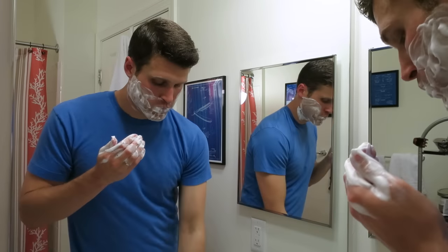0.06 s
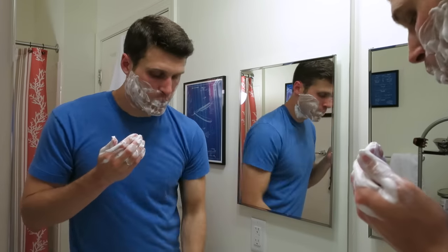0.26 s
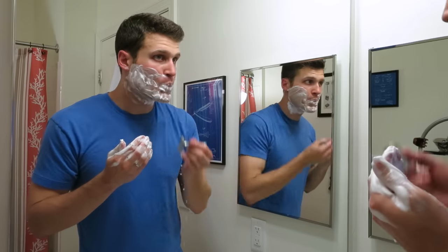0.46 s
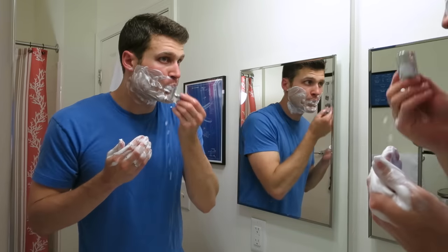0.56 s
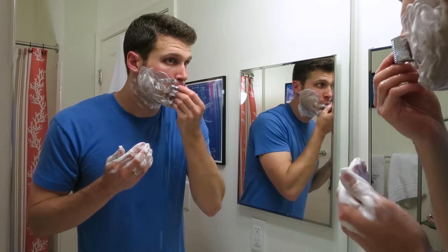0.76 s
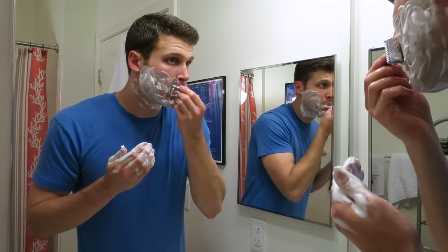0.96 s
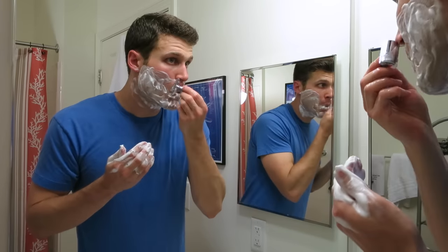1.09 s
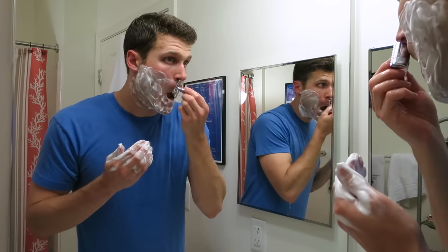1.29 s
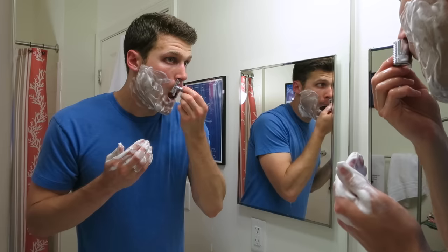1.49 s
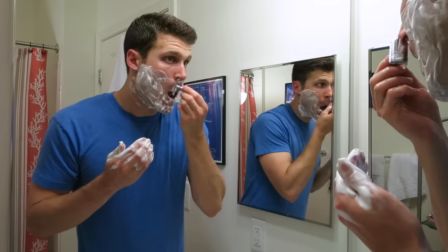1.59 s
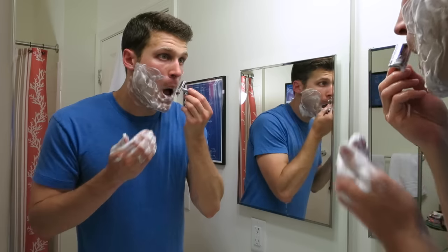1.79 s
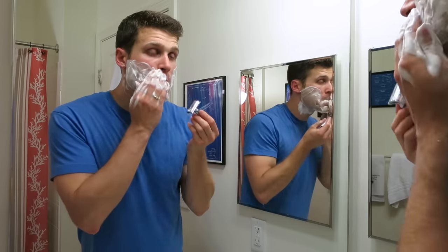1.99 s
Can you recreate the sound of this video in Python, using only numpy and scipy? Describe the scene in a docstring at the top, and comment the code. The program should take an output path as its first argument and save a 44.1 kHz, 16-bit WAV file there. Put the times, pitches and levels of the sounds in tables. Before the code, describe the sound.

A razor swishes through basin water, then faintly scrapes lathered stubble in a small bathroom.

```python
"""Rinsing a razor and shaving

A razor is swished once through a filled basin, making it ring, and lifted out with a light splash.
Drops fall back and trap ringing bubbles while the blade makes short, faint strokes through lathered
stubble. The small tiled bathroom echoes briefly and is filled with a quiet hiss and a low hum."""
import sys
import numpy as np
from scipy import signal
from scipy.fft import rfft, irfft
from scipy.io import wavfile

SR = 44100
rng = np.random.default_rng(int(sys.argv[2]) if len(sys.argv) > 2 else 0)


def dump(signal):
    """Clip the signal to [-1, 1] and save it as 16-bit WAV at the path in sys.argv[1]."""
    limited = np.clip(np.atleast_2d(signal).T, -1, 1)
    pcm = np.round(limited * 32767).astype(np.int16)
    wavfile.write(sys.argv[1], SR, pcm)


N = 90404
T = np.arange(N) / SR

# How alike nearby sounds are in both ears. Each row: frequency in Hz, likeness from -1 to 1.
NEAR_LIKENESS = [(2200, 0.86), (5500, 0.48), (9000, 0.03), (14000, -0.3)]
# The tone of the finest droplets and foam. Each row: frequency in Hz, relative level in dB.
MIST_TONE = [(1000, -22), (3000, -8), (6000, -3.5), (8500, -4), (11000, 0.5), (13500, 0), (16000, -10)]


def from_db(db):
    """Turn decibels into a number to multiply by."""
    return 10 ** (np.asarray(db) / 20)


def rms_one(x):
    """Scale a sound so that its average strength (rms) is 1."""
    return x / np.sqrt(np.mean(x ** 2) + 1e-20)


def at_hz(points, hz):
    """Read between the rows of a table, giving every octave equal space."""
    row_hz, values = np.array(points).T
    return np.interp(np.log(np.maximum(hz, 1)), np.log(row_hz), values)


def colour(x, tone):
    """Turn each frequency up or down as a tone table says."""
    size = x.shape[-1]
    gain = from_db(at_hz(tone, np.fft.rfftfreq(size, 1 / SR)))
    return irfft(rfft(x) * gain, size)


def stereo(pair, tone, likeness=NEAR_LIKENESS):
    """Blend two unrelated noises into left and right with the given tone, at strength 1."""
    alike = np.clip(at_hz(likeness, np.fft.rfftfreq(N, 1 / SR)), -.99, .99)
    mid, side = irfft(rfft(pair) * np.sqrt([1 + alike, 1 - alike]), N)
    return rms_one(colour(np.array([mid + side, mid - side]), tone))


def clicks(per_s=7000, spread_db=2.8):
    """Two streams of random clicks of uneven size; the default settings suit splashing water."""
    sizes = from_db(spread_db * np.minimum(rng.exponential(1, (2, N)), 4))
    signs = rng.choice([-1, 1], (2, N))
    happens = rng.random((2, N)) < per_s / SR
    return rms_one(sizes * signs * happens)


def envelope(rows):
    """Loudness over time: each event rises, holds, then loses 20 dB in every fall time."""
    loudness = 0
    for start, rise, hold, fall, db in rows:
        fade_db = 20 * np.maximum(T - start - rise - hold, 0) / fall
        loudness += from_db(db - fade_db) * np.clip((T - start) / rise, 0, 1)
    return loudness


def tick_tone(hz):
    """The tone of a wet tick: one broad peak, 15 dB weaker for each octave away."""
    return [(hz * 2. ** octave, -15 * abs(octave)) for octave in range(-4, 5)]


def background():
    """The room's air hisses steadily over a low hum."""
    # The tone of the hiss. Each row: frequency in Hz, relative level in dB.
    air_tone = [(25, -11), (42, -6), (60, 1), (80, -2.5), (115, 2.5), (180, 4.5), (300, 3.5), (700, -1),
                (1400, -5.5), (2500, -8), (4800, -12), (8000, -18), (13000, -21), (16000, -34)]
    # How alike the hiss is in both ears. Each row: frequency in Hz, likeness from -1 to 1.
    air_likeness = [(60, .55), (130, -.35), (290, -.6), (640, -.45), (1400, .25), (3100, .55), (6800, .4),
                    (14000, 0)]
    # The notes of the hum. Each row: pitch in Hz, level in dB.
    hum_notes = [(60, -69), (118, -72)]
    hum = sum(from_db(db) * np.sqrt(2) * np.sin(2 * np.pi * (hz * T + rng.random()))
              for hz, db in hum_notes)
    hiss = from_db(-48) * stereo(rng.standard_normal((2, N)), air_tone, air_likeness)
    return hiss + hum


def lather():
    """Tiny bubbles burst in the foam, fizzing faintly all the time."""
    return from_db(-66) * stereo(clicks(per_s=2000, spread_db=3), MIST_TONE)


def splashes():
    """Droplets come down in short showers: a coarse spray and a finer mist."""
    # Light splashes. Each row: start, rise, hold and fall in seconds, spray and mist levels in dB.
    showers = [(0.144, 0.0032, .003, .04, -49, -58), (0.153, .008, .014, .05, -56, -48.5),
               (0.2, .004, .012, .02, -37, -56), (0.268, .006, .035, .03, -58, -51),
               (0.316, .002, 0.0027, .01, -41, -42), (0.326, 0.0061, 0.0256, .12, -54, -50),
               (0.405, .012, .012, .016, -39, -54), (0.428, 0.00284, 0.005, .03, -43, -45),
               (0.443, 0.0047, 0.0092, .06, -47, -52), (0.538, .003, 0.0084, 0.01, -59, -52),
               (0.557, 0.00287, 0.00394, 0.0362, -47, -49)]
    # The tone of the spray. Each row: frequency in Hz, relative level in dB.
    spray_tone = [(60, -18.5), (200, -3.5), (600, -4.5), (1200, 0), (2200, -1.5), (3300, -1), (4500, -6.5),
                  (6500, -6.5), (8500, -16), (13000, -25), (16000, -32)]
    spray = envelope([(*timing, db) for *timing, db, _ in showers])
    mist = envelope([(*timing, db) for *timing, _, db in showers])
    return spray * stereo(clicks(), spray_tone) + mist * stereo(clicks(), MIST_TONE)


def drops():
    """Each drop gives a wet tick and traps a bubble that rings, wavering and rising in pitch."""
    # Trapped bubbles. Each row: start in seconds, starting pitch in Hz, level in dB,
    # seconds to swell, seconds to fade by 60 dB, tick level in dB compared with the bubble.
    bubbles = [(0.146, 1010, -38, 0.0031, 0.02, -2), (0.169, 615, -37.5, 0.002, 0.022, -7),
               (0.225, 1175, -22, .003, .035, -14), (0.245, 1700, -25, .004, 0.08, -18.5),
               (0.277, 1842, -29.5, 0.0023, 0.016, -12), (0.318, 2172, -30.5, 0.00072, 0.022, -8),
               (0.336, 2040, -38, 0.0024, 0.028, -8), (0.405, 388, -43, 0.0043, 0.05, -12),
               (0.421, 1169, -28, 0.00183, 0.06, -12), (0.425, 964, -35, .002, .04, -12),
               (0.426, 3404, -33, 0.0021, 0.0172, -9.5), (0.5465, 740, -27, 0.008, 0.03, -25),
               (0.602, 234.6, -42, 0.00447, 0.042, -5.5), (0.637, 6680, -48.5, 0.00185, 0.023, -1),
               (0.783, 3290, -38, .0015, .04, -1.5), (0.801, 3858, -43, 0.00205, .02, -3.5),
               (0.813, 3260, -38, .0013, .04, 0), (0.853, 6694, -44, 0.00193, .025, 0),
               (0.917, 3300, -45, 0.002, 0.02, 6), (0.957, 1540, -44, .007, 0.07, -4),
               (1.2146, 2945, -38, .003, .03, -3), (1.661, 2188, -38.5, 0.002, .06, -6)]
    rise_per_s, wobble_depth = 3.02, .025  # as shares of the starting pitch
    wobble_hz, tick_fade_s = 200, .0357
    smoothing = signal.butter(2, wobble_hz, fs=SR, output="sos")
    out, t = np.zeros(N + SR), T[:SR // 5]
    for start, hz, db, swell, fade, tick_db in bubbles:
        wobble = rms_one(signal.sosfilt(smoothing, rng.standard_normal(len(t))))
        pitch = hz * (1 + rise_per_s * t + wobble_depth * wobble)
        ring = np.sin(2 * np.pi * np.cumsum(pitch) / SR)
        ring *= from_db(-60 * np.maximum(t - swell, 0) / fade)
        tick = rms_one(colour(rng.standard_normal(len(t)), tick_tone(hz)))
        tick *= from_db(tick_db - 60 * t / tick_fade_s)
        attack = np.sqrt(np.clip(t / swell, 0, 1))
        first = int(start * SR)
        out[first:first + len(t)] += from_db(db) * attack * (ring + tick)
    return out[:N]


def basin(x):
    """The basin rings at its own notes when pushed, with little sound below or above them."""
    # The basin's notes. Each row: pitch in Hz, width in Hz (narrow rings longer), relative level in dB.
    basin_notes = [(189, 9, -7), (378, 35, -7), (437, 20, 1.5), (512, 25, -2), (595, 35, -8), (732, 45, -2),
                   (964, 26, 2), (1013, 25, -2.5), (1182, 36, 5), (1258, 25, 0), (1398, 30, -6),
                   (1543, 25, -4), (1604, 30, -4), (1748, 55, -3), (1839, 30, -5), (2655, 320, -14)]
    band_hz = [89.2, 3365]
    ringing = 0
    for hz, width, db in basin_notes:
        decay = np.exp(-np.pi * width / SR)
        feed = np.array([1, 0, -1]) * (1 - decay ** 2) / 2
        feedback = [1, -2 * decay * np.cos(2 * np.pi * hz / SR), decay ** 2]
        ringing += from_db(db) * signal.lfilter(feed, feedback, x + 1e-18)
    return signal.sosfilt(signal.butter(3, band_hz, "band", fs=SR, output="sos"), ringing)


def swish():
    """The razor churns the water, which rings the basin and tears into froth."""
    # The razor's pushes. Each row: start, rise, hold and fall in seconds, level in dB.
    pushes = [(0.147, .004, .04, .08, -47), (0.198, .009, .028, .06, -23.5)]
    # The tone of the froth. Each row: frequency in Hz, relative level in dB.
    froth_tone = [(60, -31), (250, -8), (600, 1), (1200, 0), (2000, -6), (3000, -5), (6200, -13),
                  (8000, -20), (13000, -24), (16000, -33)]
    stereo_width = np.sqrt(.02)
    effort, churn = envelope(pushes), clicks()
    mid, side = basin(churn * effort) / basin(churn).std()
    body = mid + stereo_width * side * [[1], [-1]]
    froth = from_db(-11) * effort * stereo(clicks(), froth_tone)
    return body + froth


def spatters():
    """Single droplets hit the basin wall with a sharp, bright tick."""
    # Droplet hits. Each row: start in seconds, strongest frequency in Hz, level in dB.
    droplet_hits = [(.1705, 12000, -40), (.2245, 6500, -31), (.231, 12000, -35), (.318, 11000, -35),
                    (.416, 6400, -30.5), (.431, 12500, -36.5)]
    rise_s, hold_s, fall_s = .001, 0, .005
    out = 0
    for start, hz, db in droplet_hits:
        crack = stereo(rng.standard_normal((2, N)), tick_tone(hz))
        out += envelope([(start, rise_s, hold_s, fall_s, db)]) * crack
    return out


def knocks():
    """Water bumps against the basin a few times and sets it ringing."""
    # The water's bumps. Each row: start in seconds, strength in dB before softening.
    bumps = [(0.179, -34), (0.2075, -20), (0.2283, -9), (0.4225, -30)]
    soften_above_hz = 2200
    taps = np.zeros(N)
    for start, db in bumps:
        taps[int(start * SR)] += from_db(db)
    soft_taps = signal.sosfilt(signal.butter(1, soften_above_hz, fs=SR, output="sos"), taps)
    full_tap_peak = np.abs(basin(signal.unit_impulse(N))).max()
    return basin(soft_taps) / full_tap_peak


def plunge():
    """The razor shoves the water aside with a brief low gulp."""
    # The gulp: start and length in seconds, pitch in Hz, level in dB.
    gulp = (.198, .042, 124, -37.5)
    start, length, hz, db = gulp
    progress = np.clip((T - start) / length, 0, 1)
    swell = np.sqrt(np.abs(np.sin(np.pi * progress)))
    return from_db(db) * swell * np.sin(2 * np.pi * hz * length * progress)


def shaving():
    """In each stroke the blade snips through many hairs and rasps on the skin."""
    # Blade strokes. Each row: start, rise, hold and fall in seconds, snip and rasp levels in dB.
    strokes = [(0.705, .012, 0.07, 0.12, -52.5, -54), (0.814, 0.006, 0.014, .04, -50.5, -51),
               (0.868, .022, .025, .09, -44.5, -52), (0.965, 0.015, .008, .02, -51.5, -52),
               (1.06, .02, .02, .03, -42.5, -53), (1.12, 0.0091, .01, .03, -47.5, -59),
               (1.245, .008, .014, .03, -60, -54), (1.305, 0.0247, .065, 0.05, -54.5, -66),
               (1.542, .033, 0.012, .055, -47.5, -58), (1.745, 0.019, 0.03, 0.12, -55.5, -66),
               (2.037, 0.00357, .01, .03, -44.5, -56)]
    # The tones of cut hair and scraped skin. Each row: frequency in Hz, relative level in dB.
    snip_tone = [(200, -30), (1000, -17), (3200, -7.5), (8000, -6), (10500, -1.5), (13800, 1), (16000, -5)]
    rasp_tone = [(800, -15), (3500, -1), (7000, 0), (16000, -18)]
    hairs_per_s = 4000
    snips = envelope([(*timing, db) for *timing, db, _ in strokes])
    rasps = envelope([(*timing, db) for *timing, _, db in strokes])
    hair = stereo(clicks(hairs_per_s, spread_db=3), snip_tone)
    skin = stereo(clicks(hairs_per_s, spread_db=3), rasp_tone)
    return snips * hair + rasps * skin


def bathroom(x):
    """Sound bounces off tiles and mirrors, blurring into a short echo."""
    # The tone of the echo. Each row: frequency in Hz, boost or cut in dB.
    echo_tone = [(750, -2), (3000, .5), (8000, -1), (15000, -5)]
    fade_s, delay_s, likeness, echo_db = .3055, .005, .515, -9.5
    t = T[:SR // 2]
    mid, side = rng.standard_normal((2, len(t))) * from_db(-60 * t / fade_s) * (t > delay_s)
    tail = np.sqrt(1 + likeness) * mid + np.sqrt(1 - likeness) * side * [[1], [-1]]
    tail = colour(rms_one(tail) / np.sqrt(len(t)), echo_tone)
    return from_db(echo_db) * signal.fftconvolve(x, tail, axes=1)[:, :N]


def scene():
    """Foam, water and blade sound in the room, over its hiss and hum."""
    near = lather() + splashes() + drops() + swish() + spatters() + knocks() + plunge() + shaving()
    return near + bathroom(near) + background()


def record(dry):
    """Cut away the very highest treble steeply."""
    cutoff_hz = 15850
    return signal.sosfilt(signal.ellip(12, .1, 80, cutoff_hz, fs=SR, output="sos"), dry)


dry = scene()
out = record(dry)
dump(out)
```